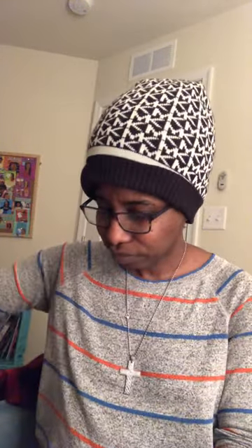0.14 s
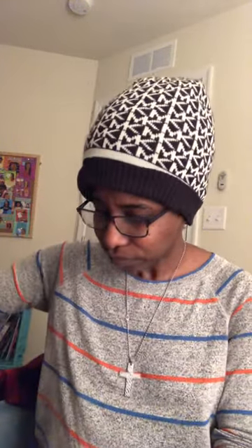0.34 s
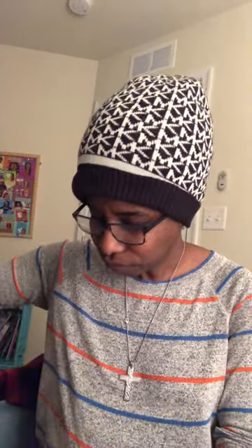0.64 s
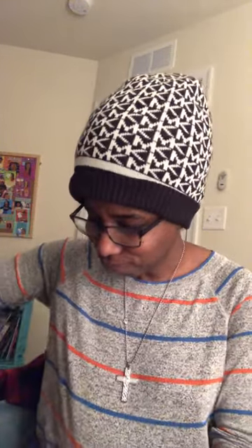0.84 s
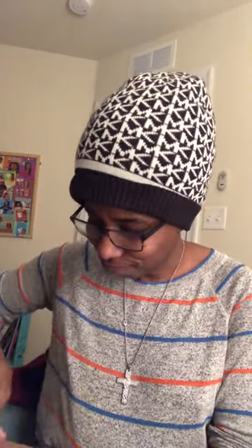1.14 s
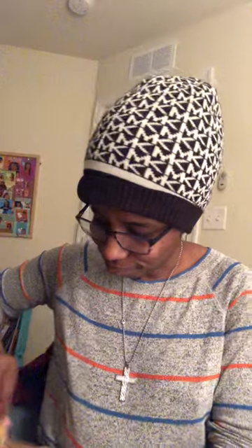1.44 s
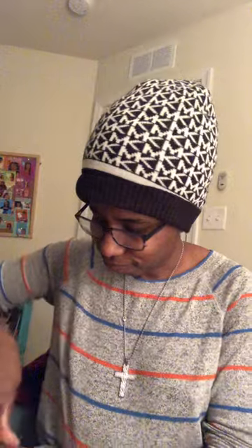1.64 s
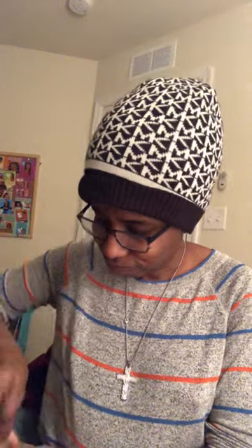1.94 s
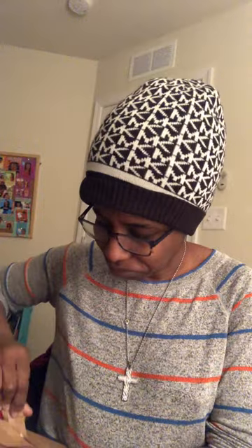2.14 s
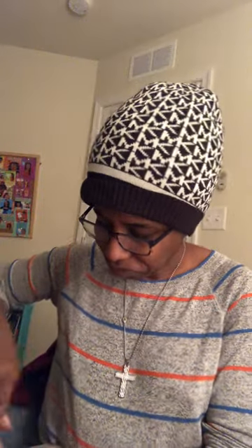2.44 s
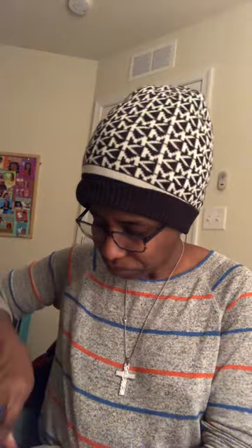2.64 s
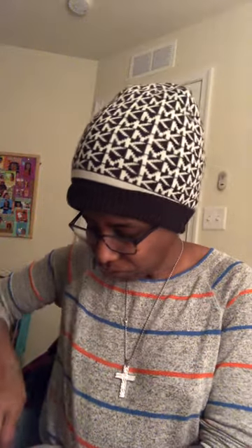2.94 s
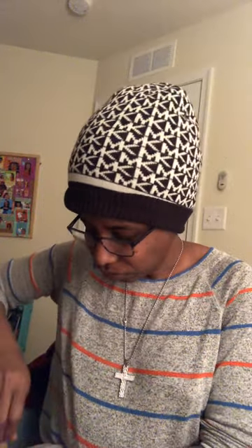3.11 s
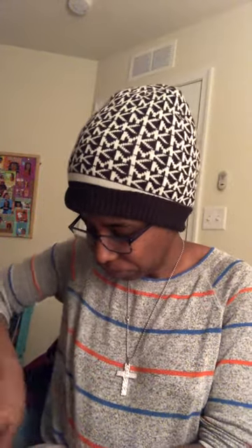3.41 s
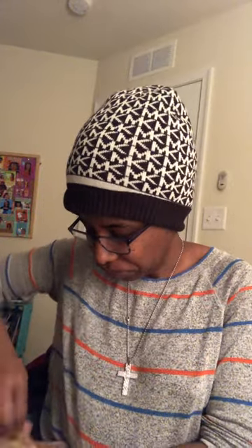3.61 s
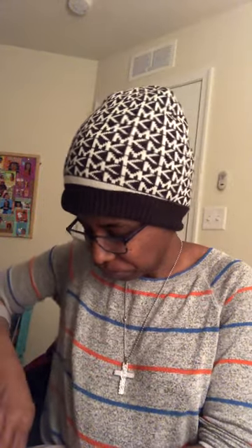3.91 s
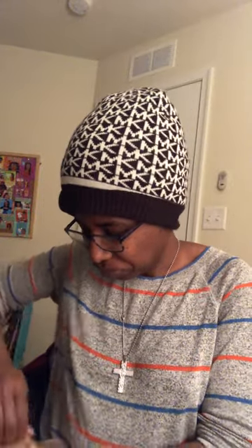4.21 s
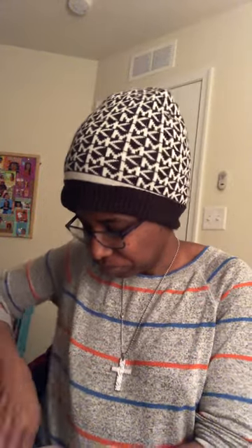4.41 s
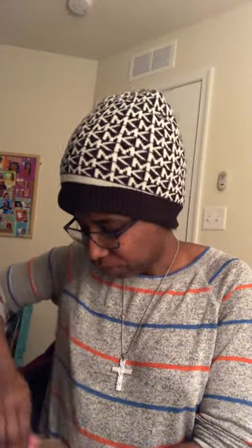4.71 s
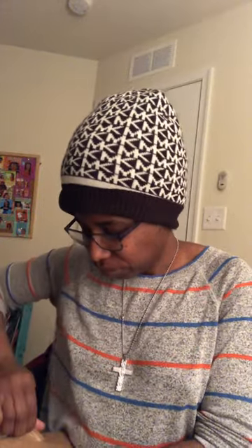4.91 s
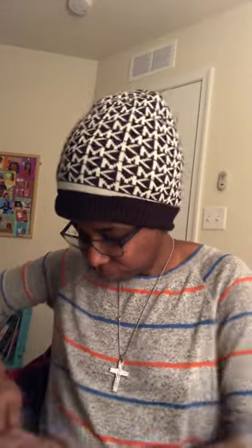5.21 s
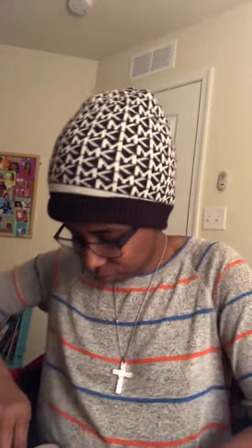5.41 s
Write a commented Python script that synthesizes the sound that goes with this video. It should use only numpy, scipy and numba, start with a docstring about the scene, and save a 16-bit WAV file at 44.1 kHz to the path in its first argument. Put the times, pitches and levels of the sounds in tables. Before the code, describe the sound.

A person handles a thick paper envelope indoors, heard close and dry with a short dull room tail and very faint hiss. Irregular crisp clicks give way to dense crackling swells and brief rips, strongest around two and three and a half seconds, with low padded bumps beneath. The activity eases late, then one hard snap closes.

```python
"""Fingers work a stiff paper mailer open close to a phone in a quiet furnished room, over a faint hiss of air.
Light snaps come first, a sharp one at 0.35 s, a heavy one at 0.93 s, then busy runs of snaps to about 4.7 s;
it thins out until a loud snap near 5.55 s ends it. Creases snap as short damped rings of cracks and paper
patches, the padded body thuds in low modes, and dense tiny grains crinkle in swells as paper buckles
and fibres tear; snaps and thuds leave a short room tail."""
import sys
import numpy as np
from scipy import signal
from scipy.fft import rfft, irfft, next_fast_len
from scipy.io import wavfile
from numba import njit

SR = 44100
rng = np.random.default_rng(int(sys.argv[2]) if len(sys.argv) > 2 else 0)


def master(y):
    """Save y as 16-bit WAV."""
    cut = np.clip(np.atleast_2d(y).T, -1, 1)
    pcm = np.round(cut * 32767)  # scale
    wavfile.write(sys.argv[1], SR, pcm.astype(np.int16))


N = 245195


def undb(db):
    """Decibels to amplitude."""
    return 10 ** (np.asarray(db) / 20)


def level(x, db):
    """Scale to an rms level in dB."""
    return x * undb(db) / np.sqrt(np.mean(x ** 2))


@njit
def ring(start, hz, t60_s, rise_samples, size, length):
    """Sum of damped sines, each with an exponential onset and decay."""
    out = np.zeros(length)
    for k in range(len(start)):
        pole = np.exp(2j * np.pi * hz[k] / SR - np.log(1000) / (t60_s[k] * SR))
        z, on = size[k] + 0j, 0.
        for i in range(start[k], min(length, start[k] + int(t60_s[k] * SR))):
            on += (1 - on) / (1 + rise_samples[k])
            z *= pole
            out[i] += on * z.imag
    return out


def grains(start_s, hz, cycles, db, rise_cycles):
    """One ring per event, lasting `cycles` periods down to -60 dB, with either sign."""
    hz = np.clip(hz, 20, .42 * SR)
    sign = rng.choice([-1., 1.], len(start_s))
    start = np.clip((start_s * SR).astype(np.int64), 0, N - 1)
    return ring(start, hz, cycles / hz, rise_cycles * SR / hz, sign * undb(db), N)


def swells(peak_s, rise_s, fall_s, *columns_db):
    """Each event swells, rounds over and fades; powers add. One envelope per level column."""
    t = np.arange(0, N, 64) / SR
    late_s = t - peak_s[:, None]
    before_peak = (np.abs(late_s) / rise_s[:, None]) ** 1.35
    after_peak = (np.abs(late_s) / fall_s[:, None]) ** 1.5
    drop_db = 10 * np.where(late_s < 0, before_peak, after_peak)
    power = undb(-np.minimum(drop_db, 90)) ** 2
    return [np.interp(np.arange(N) / SR, t, np.sqrt(undb(db) ** 2 @ power)) for db in columns_db]


# Spectrum of the air noise, relative: (freq_hz [Hz], density_db [dB per Hz])
AIR_SPECTRUM = [(20, -23), (45, 11), (70, 15.5), (130, 11), (360, 11), (800, 7.5), (1430, 5.5), (2600, 6),
                (7000, -2.5), (8500, -7), (16000, -41)]
AIR_DB = -64  # rms at the phone's input


def air():
    """Steady noise of the room and the microphone: white noise shaped by a spectrum."""
    freq_hz, density_db = np.transpose(AIR_SPECTRUM)
    size = next_fast_len(N)
    f = np.maximum(np.arange(size // 2 + 1) * SR / size, 1)
    gain = undb(np.interp(np.log(f), np.log(freq_hz), density_db))
    noise = irfft(rfft(rng.standard_normal(size)) * gain, size)
    return level(noise[:N], AIR_DB)


ROOM_T60_S, ROOM_DB, ROOM_TOP_HZ = 0.21, -15, 6900


def room(x):
    """A short dull tail from table, walls and furniture: convolution with decaying noise."""
    t = np.arange(int(.4 * SR)) / SR
    onset = np.minimum(t / 0.0023, 1)
    tail = rng.standard_normal(len(t)) * undb(-60 * t / ROOM_T60_S) * onset
    tail = signal.sosfilt(signal.butter(1, ROOM_TOP_HZ, fs=SR, output="sos"), tail)
    return undb(ROOM_DB) * signal.fftconvolve(x, tail / np.sqrt(np.sum(tail ** 2)))[:N]


# The whole mailer flexes or is pushed: (start_s [s], level_db [dB], pitch_hz [Hz])
THUDS = [(0.199, -50, 450), (0.357, -44.5, 400), (0.488, -45, 255), (0.93, -29, 420), (0.962, -34.5, 494),
         (1.276, -36, 452), (1.34, -45, 357), (1.349, -45, 456), (1.397, -47, 300), (1.529, -32, 443),
         (1.557, -43, 410), (1.58, -38.5, 370), (1.699, -34.5, 343), (1.893, -33, 410), (2.066, -63, 533),
         (2.085, -58, 400), (2.267, -41, 365), (2.286, -38, 530), (2.315, -38.5, 557), (2.573, -30, 407),
         (2.587, -40, 132), (2.605, -40, 514), (2.658, -40, 295), (2.678, -32, 417), (2.701, -42, 203),
         (2.768, -32.5, 386), (2.78, -45, 137), (2.801, -41, 218), (3.011, -56, 298), (3.188, -41.5, 304),
         (3.285, -42.5, 367), (3.331, -41.5, 330), (3.507, -47.5, 191), (3.553, -30, 910),
         (3.555, -27, 600), (3.573, -32, 387), (3.604, -41, 290), (3.663, -42.5, 460), (3.683, -46, 463),
         (3.822, -31, 168), (3.839, -26.5, 247), (3.866, -40, 200), (3.889, -46, 360), (4.032, -31, 394),
         (4.062, -53, 382), (4.199, -40, 156), (4.253, -40, 225), (4.335, -40, 400), (4.354, -26.5, 402),
         (4.387, -39, 375), (4.418, -38, 590), (4.478, -42.5, 355), (4.549, -41.5, 410), (4.606, -44, 430),
         (4.86, -48, 348), (5.133, -45, 148), (5.306, -38, 402), (5.315, -37, 124), (5.55, -40, 466)]
# Modes of the mailer: (mode_hz [Hz], mode_db [dB re thud], t60_s [s])
BODY_MODES = [(134.8, -24, 0.11), (226, -24, 0.14), (378, -7, 0.041)]


def thuds():
    """A soft push rings at its own pitch, together with the modes of the body."""
    start_s, level_db, pitch_hz = np.transpose(THUDS)
    out = grains(start_s, pitch_hz, 5.94, level_db + 8.5, 0.74)
    for mode_hz, mode_db, t60_s in BODY_MODES:
        out += grains(start_s, np.full_like(start_s, mode_hz), t60_s * mode_hz, level_db + mode_db, 0.76)
    return out


RUMBLE_DB, RUMBLE_RISE_S, RUMBLE_FALL_S = -11, 0.0067, 0.034  # level re thud


def body_rumble():
    """The body rumbles round each thud: a level envelope."""
    start_s, level_db, _ = np.transpose(THUDS)
    rise_s, fall_s = np.full_like(start_s, RUMBLE_RISE_S), np.full_like(start_s, RUMBLE_FALL_S)
    return swells(start_s, rise_s, fall_s, level_db + RUMBLE_DB)[0]


# A finger rubs, crumples or tears; rise and fall span 10 dB:
# (peak_s [s], rise_s [s], fall_s [s], level_db [dB], bright_db [dB], patch_hz [Hz])
STROKES = [(.087, 0.035, 0.018, -48, 2, 1350), (.154, .035, 0.0099, -66, -1, 1290),
           (0.206, 0.017, 0.023, -36, -0.5, 2930), (0.401, .027, 0.038, -51, 3, 3400),
           (0.498, .06, 0.11, -70, 5.5, 1340), (.668, 0.025, 0.074, -52, 5, 2380),
           (.763, 0.02, 0.023, -52.5, 1, 1430), (.95, 0.06, 0.081, -51, -1.5, 1650),
           (1.008, 0.0064, 0.0091, -34.5, 1, 4300), (1.17, 0.047, 0.082, -68, -2.5, 2580),
           (1.276, 0.011, 0.026, -35, 0, 1690), (1.33, 0.022, .021, -35.5, -1, 1840),
           (1.362, 0.017, 0.018, -41.5, 9.5, 1800), (1.396, 0.018, 0.047, -44, 7.5, 1810),
           (1.559, 0.005, 0.041, -47.5, 10, 2800), (1.652, 0.051, 0.11, -56, 3.5, 1370),
           (1.846, 0.045, .039, -46.5, 6.5, 2880), (1.893, .004, 0.055, -41, 9.5, 1850),
           (1.946, 0.028, 0.013, -40.5, 6, 3010), (1.994, 0.028, .027, -35, 6, 1870),
           (2.022, 0.015, 0.1, -38.5, -4.5, 1930), (2.078, 0.061, 0.033, -30, 5, 1880),
           (2.146, 0.026, 0.043, -34.5, 3, 2770), (2.267, 0.026, .012, -36.5, -1, 3500),
           (2.312, 0.053, 0.03, -41, 0, 1800), (2.383, 0.011, 0.026, -44, -0.5, 1750),
           (2.439, 0.032, 0.011, -47.5, -1.5, 2700), (2.539, 0.04, .027, -49.5, -4, 2550),
           (2.573, 0.011, 0.017, -42.5, 6.5, 2600), (2.646, 0.0067, .03, -39.5, 3, 2620),
           (2.679, 0.022, 0.026, -34.5, -2, 3400), (2.771, 0.023, 0.011, -50.5, -7, 1490),
           (2.831, .017, 0.072, -40, 5, 3150), (2.993, .047, 0.032, -47, 3, 2480),
           (3.038, 0.038, 0.045, -41, -0.5, 2470), (3.15, 0.027, .026, -46.5, -1.5, 1980),
           (3.186, .021, 0.022, -44.5, -2, 1780), (3.242, 0.047, 0.015, -54, -0.5, 2400),
           (3.334, 0.015, 0.016, -42, -1.5, 3440), (3.385, 0.014, 0.05, -42, 8, 1880),
           (3.47, 0.034, 0.055, -57, 7, 2410), (3.566, 0.015, 0.018, -25, 1.5, 2120),
           (3.61, 0.04, 0.061, -31, 5, 1720), (3.812, 0.055, 0.03, -47, -0.5, 1860),
           (3.839, 0.0045, 0.053, -36.5, 1, 2670), (3.942, .011, 0.024, -59, 0.5, 2720),
           (4.027, 0.04, 0.037, -38, 4.5, 2610), (4.125, 0.012, 0.094, -39, 2.5, 2650),
           (4.24, 0.046, 0.028, -47.5, -1.5, 2360), (4.357, 0.012, .028, -33, 2.5, 3000),
           (4.464, 0.031, 0.023, -47, 5, 3270), (4.525, 0.018, 0.042, -46, 8.5, 3190),
           (4.636, 0.15, .026, -65, -12, 1560), (4.663, .012, .028, -59, 2.5, 3320),
           (4.703, .024, 0.078, -48.5, -2.5, 2220), (4.79, .077, 0.091, -54.5, 4.5, 2600),
           (4.874, 0.049, 0.032, -48.5, -2, 3000), (4.951, 0.012, 0.0088, -54, 6, 3060),
           (5.106, 0.055, 0.052, -46, -2.5, 3680), (5.191, 0.053, 0.025, -41.5, 5.5, 2630),
           (5.307, 0.038, 0.03, -42, 0.5, 1220), (5.396, .03, 0.069, -52, -2.5, 2560),
           (5.5, .08, .036, -56, 0.5, 1890)]
SPRAY_DB, SPRAY_RISE_S, SPRAY_FALL_S = -11, 0.001, 0.0067  # crinkle that each snap sets off


def effort():
    """Strokes and the spray round each snap drive patches, creases, fibres; bright ones favour fibres."""
    peak_s, rise_s, fall_s, level_db, bright_db = np.transpose(STROKES)[:5]
    stroke = swells(peak_s, rise_s, fall_s, level_db - bright_db, level_db, level_db + 1.21 * bright_db)
    snap_s, ring_db, _, crack_db, _ = np.transpose(SNAPS)
    rise_s, fall_s = np.full_like(snap_s, SPRAY_RISE_S), np.full_like(snap_s, SPRAY_FALL_S)
    spray = swells(snap_s, rise_s, fall_s,
                   ring_db + SPRAY_DB, crack_db + SPRAY_DB - 9.5, crack_db + SPRAY_DB - 8)
    return [np.hypot(a, b) for a, b in zip(stroke, spray)]


def swarm(per_s, lo_hz, hi_hz, cycles, spread_db, clumps_db, rise_cycles, held_hz, share):
    """Dense clumped grains, rms 1; a share comes from under the finger and keeps near its pitch."""
    u = rng.random((int(per_s * N / SR), 4)).T
    start_s = u[0] * N / SR
    db = np.minimum(-spread_db * np.log(1 - u[2]), 14.0)
    db += np.interp(start_s, np.linspace(0, N / SR, len(clumps_db)), clumps_db)
    peak_s = np.transpose(STROKES)[0]
    nearest = np.searchsorted((peak_s[1:] + peak_s[:-1]) / 2, start_s)
    held = u[3] < share
    near_hz = held_hz[nearest] * (1 + 0.16 * (u[1] - .5))
    hz = np.where(held, near_hz, lo_hz * (hi_hz / lo_hz) ** u[1])
    return level(grains(start_s, hz, cycles * np.where(held, 1.6, 1), db, rise_cycles), 0)


# Never quite still in the hands: (time_s [s], rustle_db [dB])
HANDLING = [(0.0, -74), (0.12, -57.5), (1.31, -54), (1.45, -51), (1.64, -56.5), (1.89, -65), (2.03, -64),
            (2.12, -49), (2.32, -55), (3.34, -55.5), (3.55, -50), (3.87, -60.5), (4.33, -46.5),
            (4.74, -51.5), (4.88, -57), (5.06, -55.5), (5.23, -52), (5.56, -59)]
CREASE_HZ, CREASE_DB_PER_OCTAVE = 4350, 10  # brighter strokes work finer creases


def crinkle():
    """Small buckles ring patches, creases and fibres tick as they part, the body rumbles under the fingers."""
    rustle = undb(np.interp(np.arange(N) / SR, *np.transpose(HANDLING)))
    rumble = body_rumble() + undb(-7.5) * rustle
    buckling, creasing, parting = effort()

    bright_db, patch_hz = np.transpose(STROKES)[-2:]
    crease_hz = np.clip(CREASE_HZ * 2 ** (bright_db / CREASE_DB_PER_OCTAVE), 3400, 7600)
    fibre_hz = rng.uniform(10300, 14900, len(STROKES))
    sheet_hz = rng.uniform(340, 984, len(STROKES))
    body_hz = np.full(len(STROKES), BODY_MODES[0][0])

    # the finger slips in jerks that the paper layers share; most layers also clump on their own
    jerk, *own = rng.standard_normal((6, int(N / SR * 130)))
    patch = swarm(1800, 1225, 3590, 7.9, 1.8, 1.2 * jerk + 0.5 * own[0], 0.56, patch_hz, 0.18)
    crease = swarm(4000, 3120, 8530, 7.3, 2.3, 0.75 * jerk + 2.9 * own[1], 0.21, crease_hz, 0.27)
    fibre = swarm(6000, 5900, 27500, 10.5, 5.2, 1.07 * jerk + 3.0 * own[2], 0.41, fibre_hz, 0.26)
    # single fibres break with a broad, dry tick
    ticks = swarm(260, 5300, 17000, 5.8, 6.9, 1.0 * jerk, 0.13, crease_hz, 0.23)
    sheet = swarm(700, 316, 1080, 11.8, 2.44, 2.0 * jerk + 1.65 * own[3], 0.19, sheet_hz, .2)
    body = swarm(200, 104.7, 342, 21.0, 0.72, 4.3 * own[4], 0.62, body_hz, 0.4)

    out = patch * (undb(-7.5) * buckling + undb(-8.5) * rustle)
    out += (crease + undb(-7.5) * ticks) * (undb(-6.0) * creasing + undb(-11) * rustle)
    out += fibre * (undb(-11.5) * parting + undb(-18) * rustle)
    out += sheet * (undb(-10.5) * rumble + undb(-22) * buckling)
    return out + body * undb(-18.5) * rumble


SMALL_PER_S, SMALL_DB, SMALL_SPREAD_DB = 60, -43.5, 2.5  # base level under a -50 dB stroke
SMALL_GROWTH = .75  # dB of snap per dB of stroke


def small_snaps():
    """Lesser creases give way at random, harder as the finger works harder; columns as in SNAPS."""
    u = rng.random((int(SMALL_PER_S * N / SR), 5)).T
    start_s = u[0] * N / SR
    work, = swells(*np.transpose(STROKES)[:4])
    work_db = 20 * np.log10(work[(start_s * SR).astype(int)])
    size_db = SMALL_GROWTH * (work_db + 50) + SMALL_DB - SMALL_SPREAD_DB * np.log(1 - u[1])
    # a strong ring goes with a weak crack and the reverse
    ring_db, crack_db = size_db - 12 * u[2], size_db - 12 * (1 - u[2])
    return np.array([start_s, ring_db, 1400 * 2.87 ** u[3], crack_db, 4000 * 4.3 ** u[4]])


# Creases that snap through:
# (start_s [s], ring_db [dB], ring_hz [Hz], crack_db [dB], crack_hz [Hz]); ring = patch of paper
SNAPS = [(0.0294, -35.5, 3340, -51, 4000), (0.1185, -31, 3400, -26, 7500), (0.1484, -35, 4000, -53, 4000),
         (.33, -56, 3100, -46, 4000), (.3533, -18, 3500, -21, 5400), (.398, -34.5, 3240, -27.5, 5100),
         (0.4075, -45, 1330, -32, 6600), (.436, -55, 1420, -35, 7000), (.4742, -48.5, 850, -41, 5600),
         (.4917, -50, 4480, -41, 6500), (.599, -64, 4130, -39, 12400), (.6188, -62, 3160, -47, 5900),
         (0.659, -52, 3530, -38, 6500), (.679, -46, 3960, -37, 6700), (0.7082, -39, 2410, -32, 7200),
         (.7357, -55, 3400, -39, 7000), (0.7594, -40, 3600, -33, 6950), (0.8545, -40.5, 1760, -42.5, 3950),
         (0.9243, -18.5, 1640, -17, 7400), (0.9271, -14.5, 1480, -8.5, 6100),
         (1.0013, -37, 2300, -28, 5700), (1.0036, -35, 4270, -23.5, 6300), (1.071, -53, 3000, -48, 5960),
         (1.109, -57, 2600, -49, 6500), (1.158, -54, 2600, -48, 7000), (1.2091, -43, 2580, -49, 5600),
         (1.2341, -58, 1590, -47, 5900), (1.2753, -24.5, 1460, -18, 4530), (1.3286, -24.5, 1820, -19, 4550),
         (1.3371, -21, 1860, -11, 10200), (1.3619, -21.5, 1870, -27, 4000), (1.3936, -28, 1790, -22, 10100),
         (1.4039, -28.5, 1990, -38, 10600), (1.422, -46, 1890, -28, 10000), (1.454, -49, 1780, -38, 8800),
         (1.5244, -37, 2650, -47, 4000), (1.5293, -21.5, 2580, -22, 6100), (1.5553, -18, 2420, -7, 12300),
         (1.578, -36, 1370, -29, 7900), (1.6832, -40, 2710, -30.5, 10000), (1.6961, -28, 1600, -25.5, 5770),
         (1.774, -47, 2800, -38, 10000), (1.826, -36, 2800, -34, 6500), (1.8393, -38, 2840, -43, 4330),
         (1.8494, -38, 2840, -28, 11500), (1.8912, -18, 1790, -18, 7800), (1.9488, -34, 2880, -47, 4000),
         (1.969, -38, 1890, -21, 10600), (1.973, -32, 1940, -28, 4900), (1.991, -25, 1810, -23, 5000),
         (1.997, -32, 1700, -24, 5200), (2.0027, -44, 1550, -29, 7900), (2.008, -39, 1940, -29, 4300),
         (2.0164, -21, 3200, -23, 7700), (2.0311, -31, 1900, -24.5, 4030), (2.058, -20, 1850, -28, 4000),
         (2.062, -40, 3350, -25, 5400), (2.0747, -25, 1820, -24, 7200), (2.0836, -20, 2720, -33, 10500),
         (2.181, -42, 2930, -47, 4000), (2.2335, -33.5, 3170, -31, 4000), (2.265, -24.5, 3670, -25, 3930),
         (2.2798, -30, 1720, -33, 4000), (2.2854, -28.5, 1890, -27.5, 6240), (2.2966, -35, 2150, -38, 4100),
         (2.313, -31, 3880, -46, 4000), (2.3336, -34, 4480, -52, 4500), (2.347, -37, 3570, -34, 6200),
         (2.358, -37, 1920, -54, 4000), (2.483, -37, 4220, -32.5, 11300), (2.4987, -31, 2760, -39, 4000),
         (2.5388, -35, 2250, -37, 4000), (2.5478, -33, 3640, -44, 4000), (2.559, -23, 2570, -36, 4000),
         (2.5729, -16, 2700, -26, 4020), (2.67, -22, 3320, -44, 4000), (2.7571, -28, 1550, -27.5, 7500),
         (2.8092, -41, 3660, -29.5, 3980), (2.819, -28, 3340, -30, 3970), (2.824, -24.5, 4300, -57, 4200),
         (2.8337, -22, 3200, -47, 4000), (2.8361, -29, 3280, -38, 4000), (2.8736, -30.5, 3120, -49, 4000),
         (2.896, -35.5, 3100, -44, 4000), (2.9967, -30, 3340, -27, 7100), (3.051, -34, 3450, -30.5, 4000),
         (3.0885, -46, 3700, -58, 4000), (3.1487, -29, 2080, -28.5, 6100), (3.1513, -27.5, 2900, -30, 3930),
         (3.2047, -25.5, 4940, -53, 5000), (3.349, -39, 4530, -34, 5200), (3.386, -33, 2150, -23, 10300),
         (3.4508, -42, 1920, -35, 7600), (3.4718, -39, 2220, -35, 13700), (3.5265, -42, 3100, -43, 5400),
         (3.5543, -19.5, 2280, -20.5, 3750), (3.569, -19, 2710, -29, 7300),
         (3.5707, -25, 2720, -12.5, 7100), (3.605, -21.5, 1750, -19.5, 6540),
         (3.6408, -40, 2630, -30, 12000), (3.6641, -32, 1650, -25.5, 6300), (3.704, -34.5, 1765, -45, 4500),
         (3.8042, -26, 4280, -32, 4400), (3.8351, -22, 1730, -18, 3930), (3.88, -20.5, 3600, -24.5, 4670),
         (3.9738, -37, 2600, -31, 6260), (3.9858, -34, 3850, -32, 4230), (3.9952, -31, 3800, -41, 4340),
         (4.0204, -34.5, 2550, -28, 6000), (4.0288, -28, 2650, -27, 5630), (4.1063, -51, 2280, -34, 6200),
         (4.1366, -36, 1650, -26, 6050), (4.346, -22, 3900, -42, 4000), (4.3518, -23.5, 2610, -37, 4000),
         (4.3572, -36, 2800, -22, 13700), (4.364, -38, 4480, -22.5, 9300), (4.4762, -35, 3360, -44, 4000),
         (4.5141, -31, 2930, -50, 4000), (4.5319, -36, 1720, -25.5, 8100), (4.653, -27, 4800, -53, 4900),
         (4.661, -42, 4460, -22, 6650), (4.6974, -45, 2790, -28.5, 11200), (4.7853, -39, 1590, -36, 6600),
         (4.8699, -44, 3040, -31.5, 7400), (5.072, -40, 1570, -47, 5500), (5.1207, -36, 3920, -34, 4500),
         (5.1932, -43, 2820, -30, 11400), (5.3016, -32.5, 1330, -46, 5100),
         (5.3051, -29.5, 1400, -53, 4000), (5.4303, -37.5, 1440, -47, 6400),
         (5.5237, -40.5, 1660, -56, 4000), (5.5489, -10, 1970, -11.5, 5250), (5.5519, -24, 1830, -44, 4000)]


def snaps():
    """A crease gives in a few quick cracks; freed patch, neighbour and sheet behind ring briefly."""
    start_s, ring_db, ring_hz, crack_db, crack_hz = np.hstack([np.transpose(SNAPS), small_snaps()])
    u = rng.random((len(start_s), 7)).T
    crack = grains(start_s, crack_hz, 13.7, crack_db + 6.5, 0.33)
    crack += grains(start_s + 0.0011 * u[5], crack_hz * (1.18 + .5 * u[1]), 3.44, crack_db + 8.5, 0.19)
    crack += grains(start_s + 0.0001 + 0.00045 * u[6], crack_hz * (0.41 + 1.2 * u[0]), 3.2,
                    crack_db - 25, 0.37)
    crack += grains(start_s + .00051 * u[1], 3000 + 3000 * u[6], 5.3, crack_db - 3.0, 0.35)
    # the fold runs on for a moment in weaker after-cracks
    crack += grains(start_s + 0.00108 + 0.0015 * u[0], crack_hz * (0.57 + 1.05 * u[4]), 3.8,
                    crack_db - 2.5, 0.08)
    patch = grains(start_s, ring_hz, 9.66, ring_db + 6.5, 0.34)
    neighbour = grains(start_s + 0.00028 + 0.001334 * u[2], ring_hz * (1.54 + 0.99 * u[3]), 12.0,
                       ring_db - 0.6, 0.42)
    sheet = grains(start_s + 0.0011, 550 + 600 * u[4], 6.8, ring_db - 9, 0.72)
    return crack + patch + neighbour + sheet


def scene():
    """Paper sounds over air; only snaps and thuds excite the room."""
    hits = snaps() + thuds()
    paper = hits + room(hits) + crinkle()
    # a small light object radiates little bass
    paper = signal.sosfilt(signal.butter(3, 90, "high", fs=SR, output="sos"), paper)
    return (paper + air())[None]


TOP_HZ = 16000


def record(dry):
    """The phone rounds the loudest peaks and cuts the top."""
    rounded = np.tanh(1.31 * dry) / 1.686
    return signal.sosfilt(signal.ellip(8, .2, 60, TOP_HZ, fs=SR, output="sos"), rounded)


dry = scene()
out = record(dry)
master(out)
```